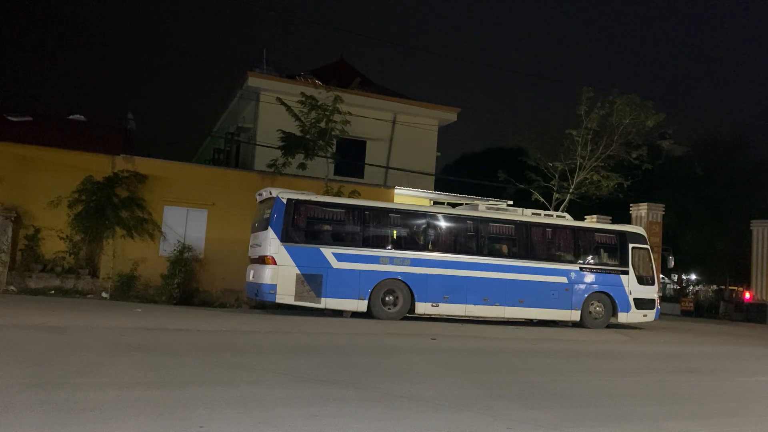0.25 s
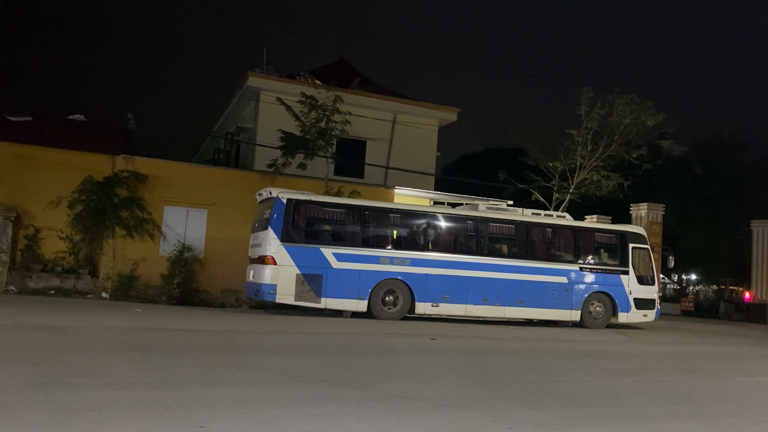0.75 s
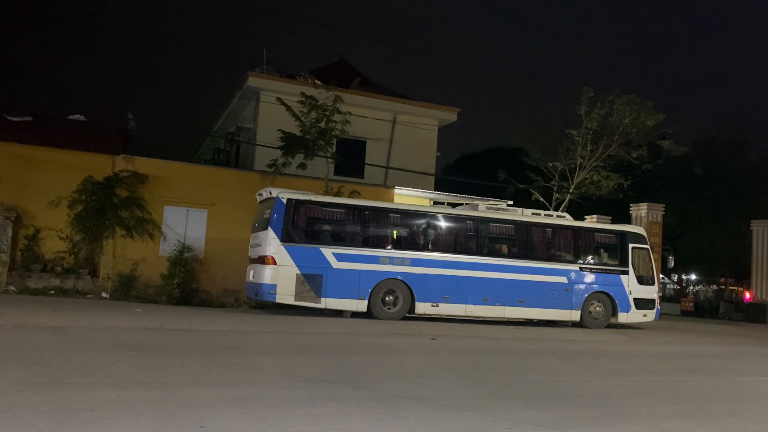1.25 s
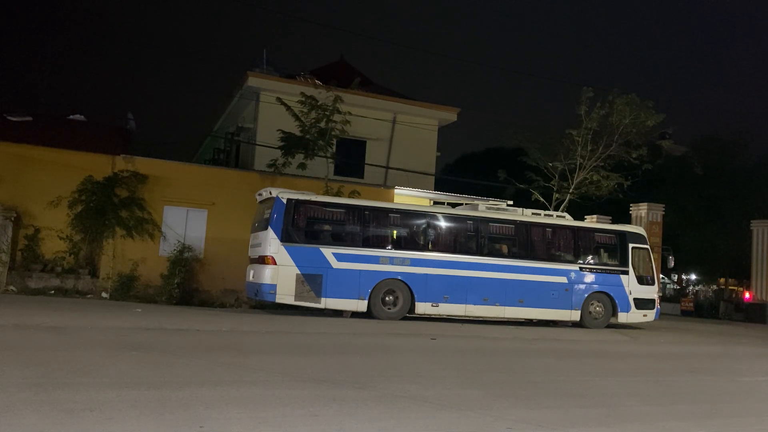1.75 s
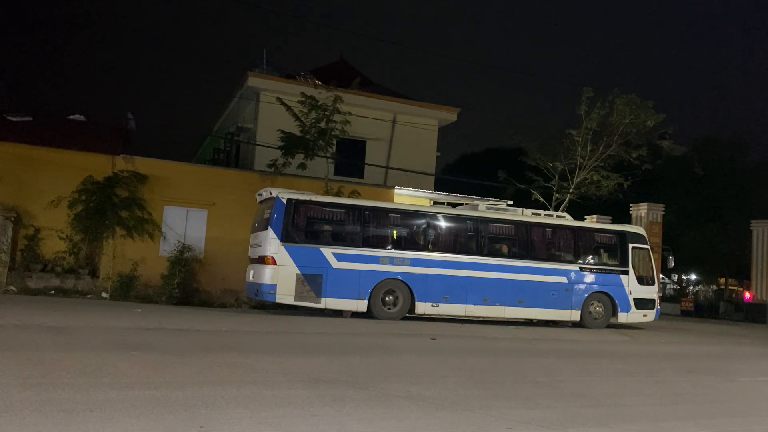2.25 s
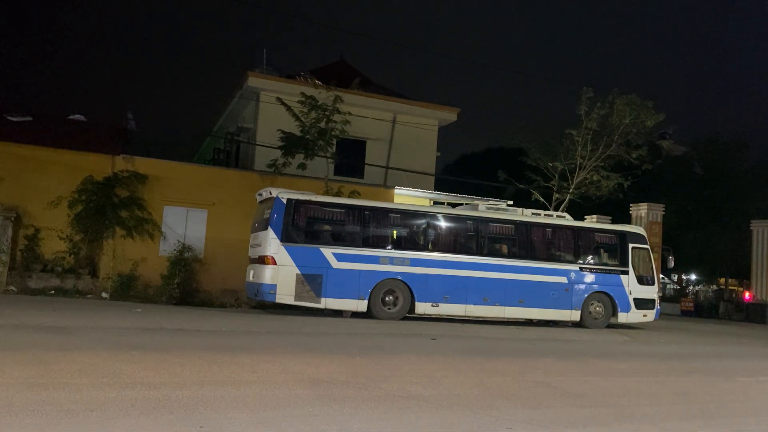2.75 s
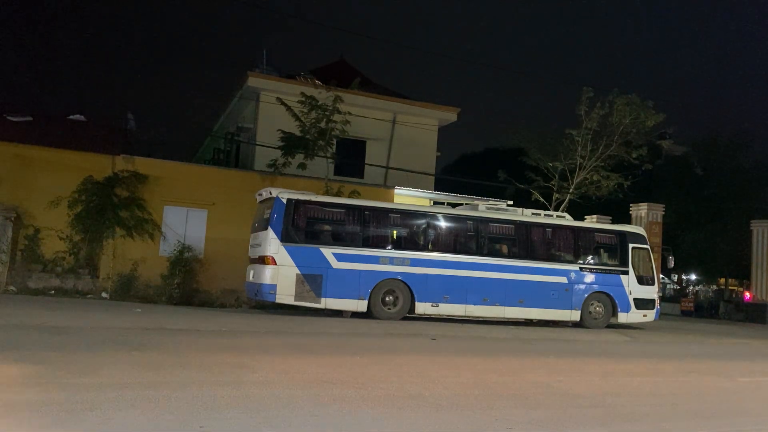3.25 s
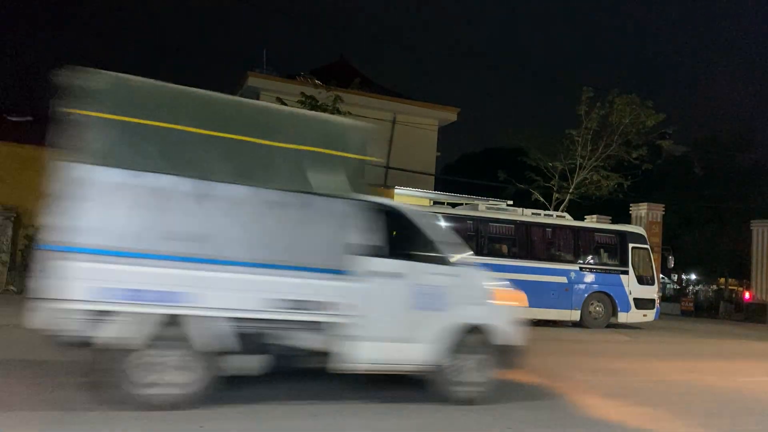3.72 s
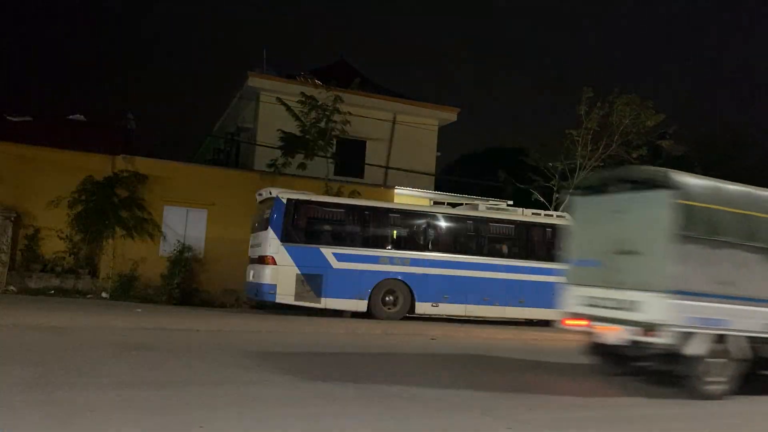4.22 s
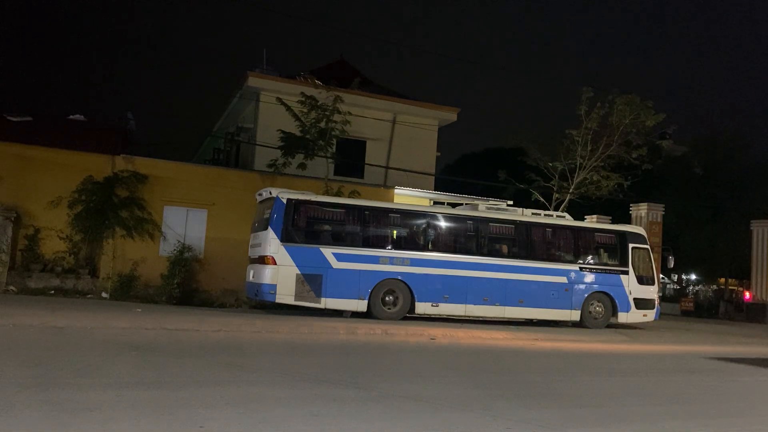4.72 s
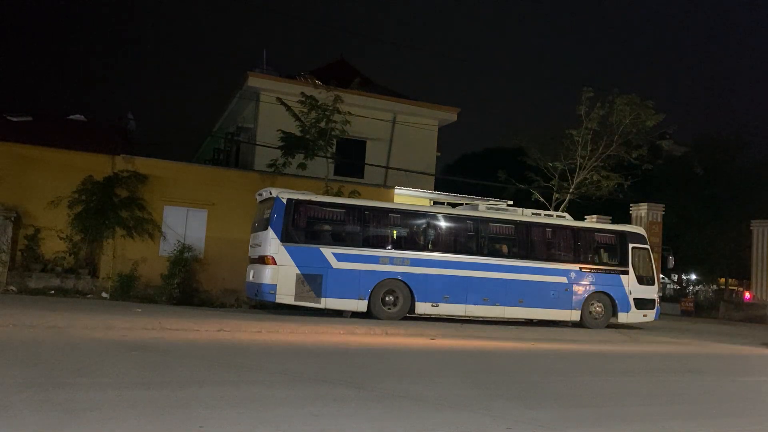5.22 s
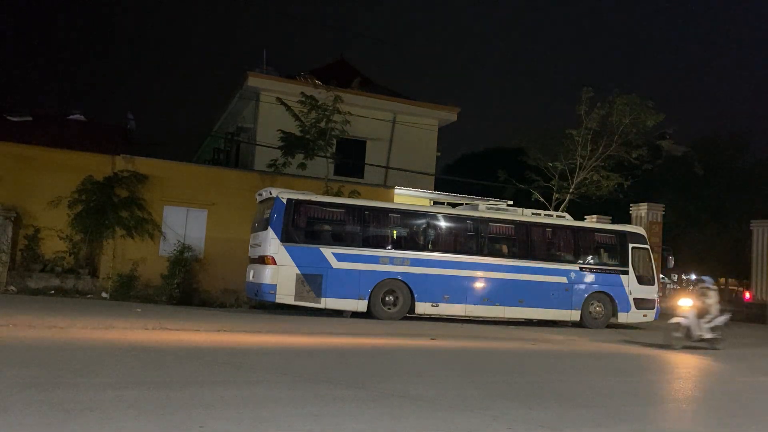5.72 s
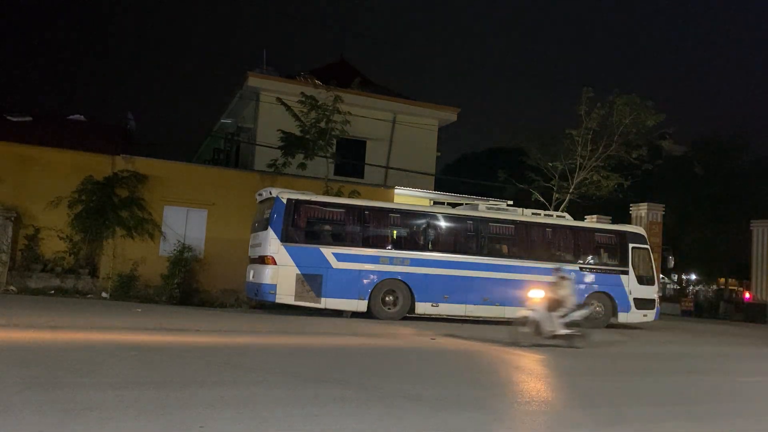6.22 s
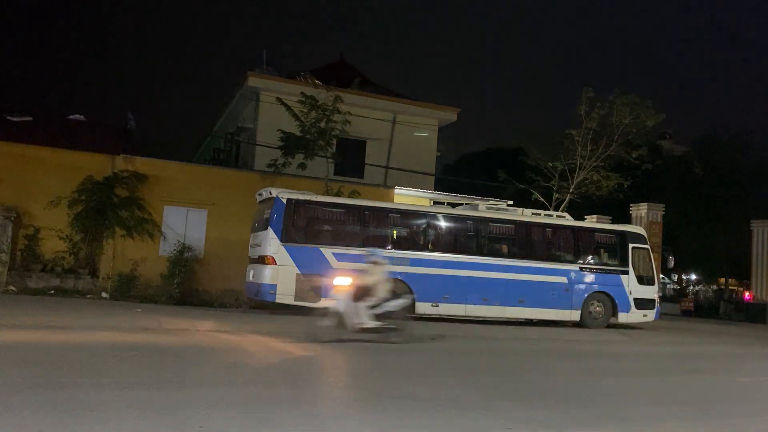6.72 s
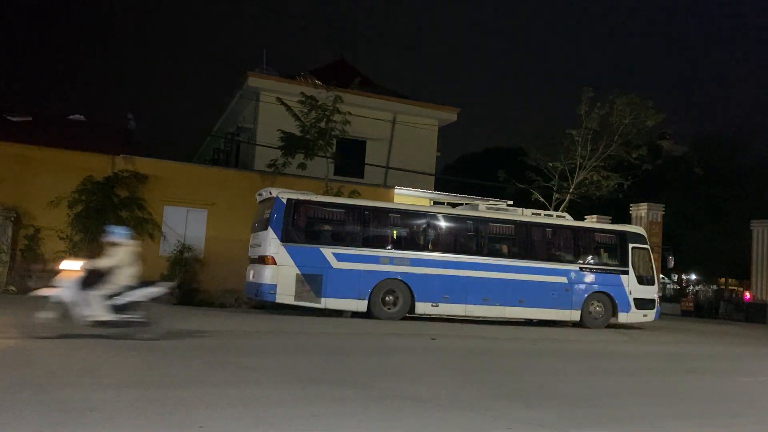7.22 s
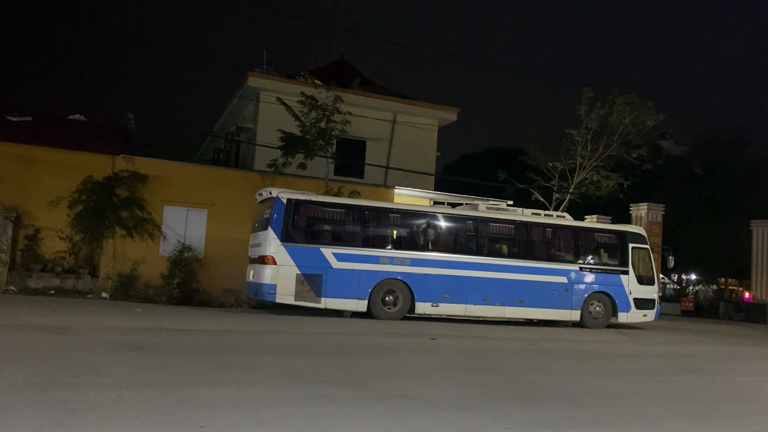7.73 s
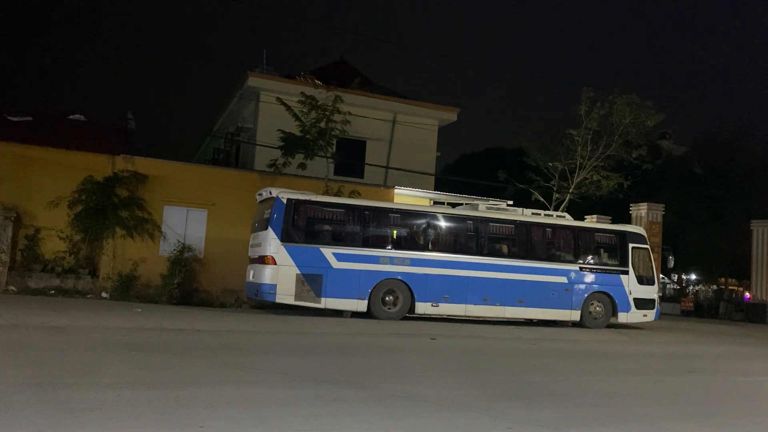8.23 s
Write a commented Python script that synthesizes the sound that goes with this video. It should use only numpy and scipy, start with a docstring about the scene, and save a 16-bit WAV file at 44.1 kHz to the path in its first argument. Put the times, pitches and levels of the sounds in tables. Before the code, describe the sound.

An open street at night, heard in stereo from the roadside, with diffuse wall echoes and faint far traffic rumble. At 0 s a buzzy, nasal two-tone horn toots for under 0.2 s and its echo trails off. A scooter putters to the right, low and popping, firing gradually faster and fading by about 2.5 s. From about 2 s a small truck approaches from the left: tyre hiss, singing tread and low engine hum swell, loudest around 3.6 s as it passes close, with gritty surges, deep load-bed booms and thin high metallic squeaks between 3.2 and 4.1 s. It moves right, pitch dipping, and fades by 5-6 s. From 5.4 s a second scooter putters in from the right, steady and fluttering, passes about 6.9 s with clattering engine and whirr, then goes left, rattling briefly near 7.6 s, dwindling to a low hum by 8.4 s.

```python
"""A street with far traffic rumbling and echoes all round. At once a two-tone horn toots: two buzzing diaphragms.
A scooter putters off to the right, firing faster: each firing excites the silencer's resonances.
A small truck passes close, left to right: engine multiples, roaring tyre noise, booming and squeaking load bed.
A second scooter then passes right to left: firings, hum, intake, whirring drive and clattering engine case."""
import sys
import numpy as np
from scipy import signal
from scipy.fft import rfft, irfft, next_fast_len
from scipy.io import wavfile
from scipy.ndimage import uniform_filter1d, map_coordinates

SR = 44100
rng = np.random.default_rng(int(sys.argv[2]) if len(sys.argv) > 2 else 0)


def int16_out(signal):
    """Quantize to a 16-bit WAV file."""
    q = np.round(np.clip(np.atleast_2d(signal).T, -1, 1) * 32767)
    wavfile.write(sys.argv[1], SR, q.astype(np.int16))


N = 373527
T = np.arange(N) / SR
HZ, FRAMES = np.fft.rfftfreq(2048, 1 / SR), np.arange(N // 512 + 2) * 512 / SR  # spectral grid: Hz, s

SOUND_M_PER_S = 343
# straight drives past the microphone: [abreast at t/s, speed/(m/s) rightwards positive, least distance/m]
TRUCK_PASS = (3.62, 8.0, 3.83)
SECOND_PASS = (6.9, -4.5, 5)

# truck: firing rate when abreast and its sinking; axles abreast before and after the middle; tread peak
TRUCK_HZ, TRUCK_SAG_HZ_PER_S = 51.2, 1.6
FRONT_AXLE_LEAD_S, REAR_AXLE_LAG_S, TREAD_LEAD_S = 0.24, 0.11, 0.72
BUMP_SWELL_S, PATCH_SWELL_S = 0.038, 0.021
# truck exhaust: [multiple of firing rate, relative level/dB]
TRUCK_ORDERS = [(1, 2.5), (2, -7.5), (3, -10.5), (5, -12)]
# truck intake: [multiple of firing rate, relative level/dB]
INTAKE_ORDERS = [(3, 0.5), (4, 1)]
# truck engine knock, colour: [f/Hz, relative level/dB per Hz]
KNOCK_COLOUR = [(450, 4), (650, 0.5), (1000, 6.5), (1500, 0.5), (2200, -13)]
# truck tyres, colours ahead, sideways, behind: [f/Hz, relative level/dB per Hz]
TYRES_COMING = [(450, 0.5), (600, -6.5), (800, -1.5), (1050, 0.5), (1400, 0), (2000, -3), (2800, -9),
                (3800, -19.5), (5300, -19), (7500, -30.5)]
TYRES_ABREAST = [(450, -6.5), (600, 0.5), (800, -6.5), (1050, 1.5), (1400, -5.5), (2000, -14),
                 (2800, -17.5), (3800, -22.5), (5300, -29), (7500, -36)]
TYRES_LEAVING = [(450, 2.5), (600, 2.5), (800, -0.5), (1050, 1), (1400, -1), (2000, -5), (2800, -17),
                 (3800, -19), (5300, -23), (7500, -27)]
# second scooter's and far tyres, colours: [f/Hz, relative level/dB per Hz]
TYRES_SCOOTER = [(450, -4), (600, -36), (800, 3), (1050, 1.5), (1400, 2), (2000, -3), (2800, 0), (3800, -9),
                 (5300, -13), (7500, -46)]
TYRES_FAR = [(450, 14.5), (600, 8.5), (800, -6), (1050, -7), (1400, -16), (2000, -21), (2800, -20),
             (3800, -10.5), (5300, -11), (7500, -9)]
# truck tyre surges on rough patches: [t/s, level/dB]
PATCHES = [(2.66, -40), (2.79, -40), (2.92, -33), (3.04, -44), (3.365, -28.5), (3.45, -31), (3.56, -35),
           (3.69, -28), (3.87, -31), (4.42, -43)]
# grit of a rough patch, colour: [f/Hz, relative level/dB per Hz]
GRIT_COLOUR = [(550, -8), (800, -5), (1000, 7), (1250, 2), (1600, -21), (2400, -18)]
# load-bed booms on bumps: [t/s, f/Hz, level/dB]
BUMPS = [(2.171, 52.3, -25.5), (3.22, 62.4, -20), (3.32, 55, -24), (3.499, 60.3, -21), (3.59, 54.7, -19),
         (3.74, 61, -21), (3.82, 51.3, -25), (3.897, 59.5, -25), (4.085, 54, -23)]
# bodywork squeaks: [t/s, f/Hz, relative level/dB, t60/s, vehicle (0 truck, 1 second scooter)]
SQUEAKS = [(3.234, 6820, -40, .28, 0), (3.312, 6750, -47, .15, 0), (3.587, 6650, -48, .1, 0),
           (3.6, 6700, -42, .12, 0), (3.623, 6450, -41, .16, 0), (3.624, 5300, -43, .3, 0),
           (3.672, 6680, -42, .3, 0), (3.674, 11250, -43, .16, 0), (3.715, 5250, -47, .15, 0),
           (7.555, 880, -42, .2, 1), (7.563, 5950, -54, .2, 1), (7.598, 700, -39, .15, 1),
           (7.612, 5900, -55, .35, 1), (7.615, 6600, -57, .35, 1), (7.632, 980, -36, .25, 1),
           (7.645, 560, -35, .16, 1)]
# horn: [t/s, low tone f/Hz, high tone f/Hz, relative level/dB]
HORN = [(0, 390, 478, -32), (.041, 390, 480, -34), (.047, 391, 481, -26), (.095, 391, 492, -25),
        (.105, 392, 497, -30), (.13, 394, 500, -21.5), (.152, 394, 500, -32), (.18, 393, 498, -60)]
# horn diaphragm response: [f/Hz, relative level/dB]
HORN_COLOUR = [(390, -13), (800, -25), (1900, -29), (2350, -8), (2750, -9), (3130, -.5), (3550, -15),
               (3900, -44), (5400, -28), (7500, -34), (12000, -38)]
# horn diaphragm rattle, colour: [f/Hz, relative level/dB per Hz]
HORN_RASP = [(2100, -26), (2380, -3), (2580, -17), (2800, -5), (3150, 4), (3350, -12), (3600, -22),
             (3800, -40)]

FIRST_BEARING = 0.59  # -1 left .. 1 right
FIRING_JITTER_CYCLES = .003
FAR_FADE_DB_PER_S = 3.5  # fall outside a level curve's stretch
# scooter firing rates: [t/s, f/Hz]
FIRST_SPEED = [(0, 23.18), (.4, 23.63), (.7, 24.23), (1.05, 24.81), (1.4, 25.56), (1.8, 26.58),
               (2.3, 27.47)]
SECOND_SPEED = [(5, 21.99), (5.5, 22.22), (5.9, 22.33), (6.3, 22.36), (6.7, 22.32), (7.15, 22.08),
                (7.5, 22.19), (7.8, 21.66), (8.47, 21.75)]
# scooter sharp pops: [t/s, level/dB]
FIRST_POP = [(0, -41), (.35, -36.5), (.8, -38.5), (1.4, -41), (2.2, -43)]
SECOND_POP = [(4.9, -42.5), (5.5, -36.5), (6.4, -39), (7.3, -35.5), (7.75, -40), (8.47, -50)]
# scooter exhaust boom: [t/s, level/dB]
FIRST_LEVEL = [(0, -35), (.35, -30.5), (1, -34.5), (1.4, -34.5), (1.7, -32), (2.1, -39), (2.4, -39)]
SECOND_LEVEL = [(5.3, -52), (5.65, -33.5), (5.92, -32.5), (6.35, -34), (6.7, -32), (7, -27), (7.33, -35.5),
                (7.6, -34), (7.88, -31.5), (8.05, -52), (8.35, -50)]
# silencer resonances: [f/Hz, swell time/s, relative level/dB]
FIRST_PIPE = [(115, .01, 0), (290, .008, -14), (342, .003, -3), (425, .006, -13)]
SECOND_PIPE = [(112, .0155, 0), (248, .008, -11), (294, .0039, -6), (335, .008, -10.5), (530, .003, -14)]
# second scooter's smooth hum: [t/s, level/dB]
HUM = [(5, -55), (5.4, -30), (5.9, -59), (6.45, -34.5), (6.9, -60), (7.27, -45), (7.38, -31.5), (7.65, -35),
       (7.82, -33), (8.12, -29), (8.28, -32.5), (8.47, -28.5)]
# lines in that hum: [multiple of firing rate, relative level/dB]
HUM_ORDERS = [(4, -11), (6, -2.5), (12, -21)]
# second scooter's lowest resonance ringing between firings: [t/s, level/dB]
RING_ON = [(5.45, -56), (5.62, -45), (5.93, -35), (6.3, -53), (6.72, -50), (7.07, -33), (7.35, -58),
           (7.62, -40), (7.78, -58), (8.12, -55), (8.27, -35), (8.45, -57)]
# second scooter's intake: [multiple of firing rate, relative level/dB]
SCOOTER_INTAKE = [(7, 1.5), (10, -7), (12, -4)]
# second scooter's engine case, colour: [f/Hz, relative level/dB per Hz]
CASE_COLOUR = [(1200, -2), (1900, 8), (2900, -3), (3800, -13), (6000, -10), (8000, -35), (11000, -14)]
# second scooter's drive whirr, colour: [f/Hz, relative level/dB per Hz]
WHIRR_COLOUR = [(1250, -14), (1520, 0), (1800, -32)]

# drone of engine bays and bodywork, colour: [f/Hz, relative level/dB per Hz]
DRONE_COLOUR = [(50, -9), (90, -6), (130, 3.5), (190, 0.5), (280, -2.5), (360, -3.5), (450, -19),
                (600, -11.5), (1000, -83)]
# road-surface hiss, colour: [f/Hz, relative level/dB per Hz]
FIZZ_COLOUR = [(6000, -12), (7800, -1), (9000, -4), (10800, 1.5), (11800, -1.5), (13000, -11)]
# traffic rumble, colour: [f/Hz, relative level/dB per Hz]
RUMBLE_COLOUR = [(20, -45), (35, -40), (48, -5), (62, 4), (80, 2), (120, -30), (200, -30)]
# distant traffic rumble: [t/s, level/dB]
FAR_RUMBLE = [(0, -38), (1, -65), (6.5, -47), (8.4, -41)]
# small sharp clicks: [t/s, level/dB]
CLICKS = [(.3835, -47), (2.9652, -42), (5.2774, -43), (7.007, -44), (7.1955, -42)]

# weights in the road noise's bearing, relative to the second scooter abreast
TRUCK_PULL, FIRST_PULL, FIRST_PULL_FADE_S = 39, 0.3, 0.83
# street reverberation, unstretched: [f/Hz, t60/s]
STREET = [(100, 0.62), (500, 1), (3000, 0.8), (8000, 0.17)]
# left-right likeness of scattered sound at the two ports, clipped to -1..1: [f/Hz, likeness]
SCATTERED = [(50, 4.5), (130, 0.8), (400, 0.6), (700, -0.24), (1100, -0.38), (1800, 1.1), (3000, .5),
             (4500, 0), (5700, 1.1), (7000, 0)]
# colour of the microphone ports: [f/Hz, left minus right level/dB]
PORT_TILT = [(400, 0.5), (1000, 1), (1600, -2.5), (2400, -2.5), (4000, -1.5), (5700, -8.5), (7500, -3.5),
             (10000, 2.5)]
PORT_LAG_S = .00039  # between the ports, for sound from one side
EDGE_HZ = 12600


def truck_engine(bearing):
    """Exhaust, intake and knock share one sinking firing rate, bent down by Doppler shift in passing."""
    own_hz = TRUCK_HZ - TRUCK_SAG_HZ_PER_S * (T - TRUCK_PASS[0])
    hz = own_hz / (1 + bearing * TRUCK_PASS[1] / SOUND_M_PER_S)
    exhaust_db = heard(TRUCK_PASS, T, near_db=-30, fall_db=10.5, front_db=4.5)
    exhaust = engine(hz, exhaust_db, TRUCK_ORDERS, wobble=0.01474, flutter_db=1.5)
    intake_db = heard(TRUCK_PASS, T, near_db=-36.0, fall_db=9, front_db=9)
    intake = engine(hz, intake_db, INTAKE_ORDERS, wobble=.04, flutter_db=2.5)
    phase = np.cumsum(hz) / SR % 1
    knock = evened(np.exp(-phase / .22) * gain_of(2.5 * waver(50)) * noise(KNOCK_COLOUR))
    knock_db = heard(TRUCK_PASS, T, near_db=-37, fall_db=9, front_db=1.0)
    return exhaust + intake + knock * gain_of(knock_db)


def engine(hz, db, orders, wobble, flutter_db):
    """Muffled engine: a few multiples of the firing rate, each fluttering."""
    turns = np.cumsum(hz * (1 + wobble * waver(14))) / SR
    lines = 0
    for order, order_db in orders:
        line = np.sin(2 * np.pi * round(order) * turns)
        lines = lines + gain_of(order_db + flutter_db * waver(16)) * line
    return gain_of(db) * evened(lines)


def tyres(far_db):
    """Truck tyres colour noise ahead, behind and sideways per axle; scooter and far tyres add theirs."""
    ahead = heard(TRUCK_PASS, FRAMES, near_db=-35.5, fall_db=6.0, front_db=10)
    front_axle = heard(TRUCK_PASS, FRAMES + FRONT_AXLE_LEAD_S, near_db=-33, fall_db=40, front_db=-5.0)
    rear_axle = heard(TRUCK_PASS, FRAMES - REAR_AXLE_LAG_S, near_db=-26.5, fall_db=22, front_db=0.8)
    behind = heard(TRUCK_PASS, FRAMES, near_db=-35.0, fall_db=6.0, front_db=-10.5)
    small = heard(SECOND_PASS, FRAMES, near_db=-43.0, fall_db=4.5, front_db=-1.0)
    layers = [
        (TYRES_COMING, [ahead]), (TYRES_ABREAST, [front_axle, rear_axle]), (TYRES_LEAVING, [behind]),
        (TYRES_SCOOTER, [small]), (TYRES_FAR, [far_db]),
    ]
    return sum(glow(colour, levels, lumpy_db=1.1) for colour, levels in layers)


def tread_song(width_hz, rest_hz):
    """The truck's tread sings in one band, peaking ahead of it, lowered by Doppler shift in passing."""
    bearing = drive_by(TRUCK_PASS, FRAMES)[0]
    centre_hz = rest_hz / (1 + bearing * TRUCK_PASS[1] / SOUND_M_PER_S)
    shape = np.exp(-((HZ[:, None] - centre_hz) / width_hz) ** 2) + 1e-12
    db = heard(TRUCK_PASS, FRAMES + TREAD_LEAD_S, near_db=-35.5, fall_db=15, front_db=0.5)
    return shape / shape.sum(0) * gain_of(db) ** 2


def rough_road(grit_db):
    """On each rough patch the tyre roar jumps up, gritty, and sinks back."""
    level = 0
    for s, db in PATCHES:
        age = np.maximum(T - s, 0) / PATCH_SWELL_S
        level = level + gain_of(db) * age * np.exp(1 - age)
    return level * evened(noise(GRIT_COLOUR) * gain_of(grit_db * waver(180)))


def load_bed():
    """Each bump sets off one deep boom."""
    out = np.zeros(N)
    for s, hz, db in BUMPS:
        boom = ring(hz, BUMP_SWELL_S, db)
        out[round(s * SR):][:len(boom)] += boom
    return out


def squeaks(level_db, scratch_hz, chatter_db):
    """Loose metal on each vehicle rubs briefly, chatters, and rings on an unsteady pitch."""
    out, t = np.zeros((2, N)), T[:SR // 2]
    for s, hz, db, t60, vehicle in SQUEAKS:
        turns = np.cumsum(hz + scratch_hz * rng.standard_normal(len(t))) / SR
        onset = np.minimum(t / .003, 1)
        fade = gain_of(db + level_db - 60 * t / t60) * onset
        out[vehicle, round(s * SR):][:len(t)] += fade * np.sin(2 * np.pi * turns)
    return out * gain_of(chatter_db * waver(120))


def horn(level_db, high_db, rasp_db):
    """Two buzzing diaphragms, overtones near 3 kHz carrying the toot; each rattles once a cycle."""
    count = SR // 4
    low_hz, high_hz, db = (c[:count] for c in follow(HORN))
    toot = rattle = 0
    for hz, tone_db in ((low_hz, 0), (high_hz, high_db)):
        turns = np.cumsum(hz * (1 + .008 * waver(400)[:count])) / SR
        for k in range(1, 26):
            overtone = np.sin(2 * np.pi * (k * turns + rng.random()))
            toot = toot + gain_of(tone_db + read(HORN_COLOUR, k * hz)) * overtone
        rattle = rattle + np.exp(-2 * (turns % 1)) * noise(HORN_RASP)[:count]
    blast = evened(toot) + gain_of(rasp_db) * evened(rattle)
    return np.pad(gain_of(level_db + db) * blast, (0, N - count))


def scooter(turns, boom_level, pop_level, pipe, uneven_db, drift_db, rasp_db, tick_db):
    """Jittered firings pop in drifting upper resonances, boom in the lowest, and spit gas."""
    turns = turns + FIRING_JITTER_CYCLES * waver(25)
    firings = np.diff(np.floor(turns), prepend=np.floor(turns[0]))
    modes = []
    for mode in pipe:
        uneven = firings * gain_of(uneven_db * waver(25))
        modes.append(signal.oaconvolve(uneven, ring(*mode))[:N])
    boom, *pop = modes
    pops = sum(mode * gain_of(drift_db * waver(5)) for mode in pop)
    spit = np.exp(-(turns % 1) / 0.14)
    rasp = evened(spit * noise([(250, 1.0), (500, -1.5), (800, -2), (2000, -9.5), (5000, -13.5)]))
    tick = evened(spit * noise([(4000, 1), (7000, -57), (11000, 32), (12500, 20)]))
    sharp = evened(pops) + gain_of(rasp_db) * rasp + gain_of(tick_db) * tick
    return gain_of(fading(boom_level)) * evened(boom) + gain_of(fading(pop_level)) * sharp


def cycles(speed, fires_at):
    """Engine cycles, counted from the firing at fires_at seconds."""
    turns = np.cumsum(follow(speed)[0]) / SR
    return turns - np.interp(fires_at, T, turns)


def ring(hz, swell_s, db):
    """A resonance that swells to db and dies away."""
    t = T[:SR // 4]
    envelope = (t / swell_s) ** 2 * np.exp(2 - 2 * t / swell_s)
    return gain_of(db) * envelope * np.sin(2 * np.pi * hz * t)


def hum(turns, lag_s, flutter_db):
    """Multiples of the firing rate ring on between firings and swell by themselves."""
    late = turns - lag_s * follow(SECOND_SPEED)[0]
    lines = 0
    for order, db in HUM_ORDERS:
        line = np.cos(2 * np.pi * round(order) * late)
        lines = lines + gain_of(db + flutter_db * waver(6.6)) * line
    return gain_of(fading(HUM)) * evened(lines)


def ring_on(turns, order):
    """The multiple of the firing rate nearest the lowest resonance builds up and sinks again."""
    return gain_of(fading(RING_ON)) * evened(np.sin(2 * np.pi * order * turns))


def scooter_intake(near_db, fall_db):
    """The intake throbs on multiples of the firing rate, strongest close to abreast."""
    level_db = heard(SECOND_PASS, T, near_db, fall_db, front_db=-7.0)
    return engine(follow(SECOND_SPEED)[0], level_db, SCOOTER_INTAKE, wobble=0.0076, flutter_db=1.0)


def engine_case(turns, bearing, near_db, beam_db, aim, throb):
    """The second scooter's engine case clatters twice a cycle, in a narrow beam to the side."""
    clatter = evened(noise(CASE_COLOUR) * (1 + throb * np.cos(4 * np.pi * turns)))
    return gain_of(near_db - beam_db * abs(bearing - aim)) * clatter


def whirr():
    """The second scooter's drive whirrs in one narrow band, mostly forwards."""
    level_db = heard(SECOND_PASS, FRAMES, near_db=-49.0, fall_db=4.0, front_db=4.5)
    return glow(WHIRR_COLOUR, [level_db], lumpy_db=-1.0)


def drone(far_db):
    """Engine bays and bodywork drone as noise with each passing vehicle."""
    truck = heard(TRUCK_PASS, FRAMES, near_db=-26.5, fall_db=6.0, front_db=-1.2)
    small = heard(SECOND_PASS, FRAMES, near_db=-39, fall_db=-0.5, front_db=-2.0)
    return glow(DRONE_COLOUR, [truck, small, far_db], lumpy_db=1.5)


def fizz(far_db):
    """Fine road-surface hiss of each vehicle, falling with distance."""
    truck = heard(TRUCK_PASS, FRAMES, near_db=-53.5, fall_db=9.5, front_db=-3.5)
    small = heard(SECOND_PASS, FRAMES, near_db=-60.0, fall_db=5.0, front_db=1.3)
    first = -63 - FAR_FADE_DB_PER_S * 2 * FRAMES
    return glow(FIZZ_COLOUR, [truck, small, first, far_db], lumpy_db=2.5)


def clicks(decay_s):
    """A few tiny, dry, bright clicks: noise bursts dying exponentially."""
    level = sum(gain_of(db) * (T >= s) * np.exp(-abs(T - s) / decay_s) for s, db in CLICKS)
    return level * noise([(4500, 7), (8000, -5), (11000, 6), (13000, -5)])


def rumble():
    """The truck rumbles over the far traffic."""
    truck = heard(TRUCK_PASS, FRAMES, near_db=-33, fall_db=3.5, front_db=3.0)
    far = np.interp(FRAMES, *np.transpose(FAR_RUMBLE))
    return glow(RUMBLE_COLOUR, [truck, far], lumpy_db=-1.5)


def glow(colour, levels_db, lumpy_db):
    """Power over time and pitch of a noise fed by several sources, swelling in uneven lumps."""
    above = 1 + (HZ / colour[-1][0] / 1.08) ** 30
    below = 1 + (colour[0][0] / (HZ + 1) / 1.2) ** 12
    shape = gain_of(read(colour, HZ)) ** 2 / above / below
    total = sum(gain_of(db) ** 2 for db in levels_db) * np.ones(len(FRAMES))
    power = np.outer(shape / shape.sum(), total)
    lumps = uniform_filter1d(rng.standard_normal(power.shape), size=50, axis=0)
    lumps = evened(uniform_filter1d(lumps, size=4, axis=1))
    return power * gain_of(lumpy_db * lumps) ** 2


def road(direct_share, shade_db):
    """Road noise: part comes straight from the vehicles by weight, the rest from all around."""
    power = tyres(far_db=-46.5) + drone(far_db=-43.5) + fizz(far_db=-84) + rumble() + whirr()
    power = power + tread_song(width_hz=160, rest_hz=1230)
    truck_bearing, truck_doublings = drive_by(TRUCK_PASS, FRAMES)
    second_bearing, second_doublings = drive_by(SECOND_PASS, FRAMES)
    bearings = np.array([truck_bearing, second_bearing, np.full(len(FRAMES), FIRST_BEARING)])
    pulls = np.array([
        TRUCK_PULL * np.exp(-2 * truck_doublings),
        np.exp(-2 * second_doublings),
        FIRST_PULL * np.exp(-FRAMES / FIRST_PULL_FADE_S),
    ])
    pulls = pulls / pulls.sum(0)
    bearing = (pulls * bearings).sum(0)
    share, hz = np.clip(direct_share, 0, 1), HZ[:, None]
    straight = sum(p * np.exp(2j * np.pi * hz * b * PORT_LAG_S) for p, b in zip(pulls, bearings))
    same = share * straight + (1 - share) * np.clip(read(SCATTERED, hz), -1, 1)
    real, imaginary = rng.standard_normal((2, 2, *power.shape))
    left, other = real + 1j * imaginary
    right = same * left + np.sqrt(np.maximum(1 - abs(same) ** 2, 0)) * other
    shade = gain_of(shade_db * bearing * hz / (hz + 700))  # the case shadows the treble
    spectra = np.array([left / shade, right * shade]) * np.sqrt(power * len(HZ))
    sound, white = (signal.istft(z, nperseg=2048, noverlap=1536)[1] for z in (spectra, left))
    return sound[:, :N] / white.std()


def street(x, stretch):
    """Scattered wall echoes, stretch times longer from far ones; port likeness varies with frequency."""
    sparse = rng.random((2, SR)) < .06
    taps = rng.standard_normal((2, SR)) * sparse * (T[:SR] > .012)
    hz, t, z = signal.stft(taps, SR, nperseg=512)
    t60 = stretch * read(STREET, hz)[:, None]
    same = np.clip(read(SCATTERED, hz), -1, 1)[:, None]
    z = z * gain_of(-60 * t / t60) / np.sqrt(t60)
    mid, side = signal.istft(z * np.sqrt([1 + same, 1 - same]), SR, nperseg=512)[1]
    tail = np.array([mid + side, mid - side])
    return signal.fftconvolve(x[None], tail / np.linalg.norm(tail[0]), axes=1)[:, :N]


def drive_by(path, t):
    """Bearing (-1 left .. 1 right), and how many times the distance has doubled from its least."""
    abreast_s, speed, distance = path
    along = speed * (t - abreast_s)
    r = np.hypot(along, distance)
    return along / r, np.log2(r / distance)


def heard(path, t, near_db, fall_db, front_db):
    """Level of a passing source: loses fall_db per doubling of distance, beams front_db forwards."""
    bearing, doublings = drive_by(path, t)
    return near_db - fall_db * doublings - front_db * bearing * np.sign(path[1])


def place(x, bearing):
    """The microphone port nearer the source hears it earlier."""
    lead = bearing * PORT_LAG_S * SR / 2
    return np.array([map_coordinates(x, [np.arange(N) + side * lead], order=3) for side in (-1, 1)])


def fading(curve):
    """Level curve that falls ever lower away from its first and last points."""
    away_s = abs(T - np.clip(T, curve[0][0], curve[-1][0]))
    return follow(curve)[0] - FAR_FADE_DB_PER_S * away_s


def noise(colour):
    """Noise of the given spectrum, rms 1, falling away steeply beyond its ends."""
    size = next_fast_len(N)
    hz = np.fft.rfftfreq(size, 1 / SR)
    above = 1 + (hz / colour[-1][0] / 1.1) ** 12
    below = 1 + (colour[0][0] / (hz + 1) / 1.3) ** 8
    spectrum = rfft(rng.standard_normal(size)) * gain_of(read(colour, hz)) / above / below
    return evened(irfft(spectrum, size)[:N])


def waver(rate_hz):
    """Smooth chance of rms 1 that changes about rate_hz times a second."""
    return evened(np.interp(T * rate_hz, np.arange(N), rng.standard_normal(N)))


def follow(rows):
    """Each column of a curve, at every sample."""
    s, *columns = np.transpose(rows)
    return [np.interp(T, s, c) for c in columns]


def read(points, hz):
    """A spectrum on a log-frequency axis."""
    f, value = np.transpose(points)
    return np.interp(np.log(hz + 1), np.log(f), value)


def evened(x):
    """Scales to rms 1."""
    return x / np.sqrt(np.mean(x ** 2) + 1e-20)


def gain_of(db):
    """Decibels to gain."""
    return 10 ** (np.asarray(db) / 20)


def scene():
    """Each vehicle sounds from its bearing and feeds the street's echoes; road noise and clicks join."""
    truck_bearing, second_bearing = drive_by(TRUCK_PASS, T)[0], drive_by(SECOND_PASS, T)[0]
    truck_squeaks, second_squeaks = squeaks(level_db=3, scratch_hz=850, chatter_db=2.5)
    truck = truck_engine(truck_bearing) + rough_road(grit_db=1.5) + load_bed() + truck_squeaks
    toot = horn(level_db=1, high_db=-4, rasp_db=-5.5)

    first_turns = cycles(FIRST_SPEED, fires_at=.5086)
    first = scooter(first_turns, FIRST_LEVEL, FIRST_POP, FIRST_PIPE,
                    uneven_db=1.0, drift_db=1.0, rasp_db=-22.0, tick_db=-25.5)
    second_turns = cycles(SECOND_SPEED, fires_at=6.9216)
    second = scooter(second_turns, SECOND_LEVEL, SECOND_POP, SECOND_PIPE,
                     uneven_db=2.2, drift_db=2.8, rasp_db=-13, tick_db=-29.5)
    case = engine_case(second_turns, second_bearing, near_db=-43.5, beam_db=29, aim=-0.047, throb=0.45)
    second = second + second_squeaks + case
    tones = hum(second_turns, lag_s=0.0192, flutter_db=0.3) + ring_on(second_turns, order=5)
    tones = tones + scooter_intake(near_db=-36, fall_db=41)  # sent direct only, no echoes

    direct = place(first, FIRST_BEARING) + place(truck + toot, truck_bearing)
    direct = direct + place(second + tones, second_bearing)
    echoes = street(gain_of(-14) * (first + second + truck) + gain_of(-9) * toot, stretch=1)
    far_echoes = street(gain_of(-18) * toot, stretch=3.2)
    return direct + echoes + far_echoes + clicks(decay_s=0.0019) + road(direct_share=0.21, shade_db=1.0)


def record(dry):
    """The two ports colour the sound unequally and shed deep bass; then the band limit."""
    tilt = gain_of(read(PORT_TILT, np.fft.rfftfreq(N, 1 / SR)) / 2)
    coloured = irfft(rfft(dry) * np.array([tilt, 1 / tilt]), N)
    thinned = signal.sosfilt(signal.butter(4, 36, "high", fs=SR, output="sos"), coloured)
    band_limit = signal.firwin(511, EDGE_HZ, window=("kaiser", 9), fs=SR)
    return signal.oaconvolve(thinned, band_limit[None], "same")


dry = scene()
out = record(dry)
int16_out(out)
```